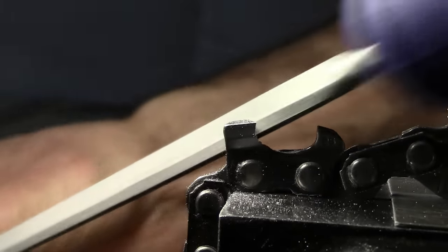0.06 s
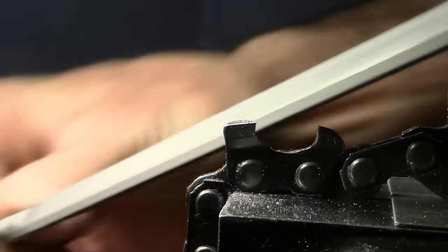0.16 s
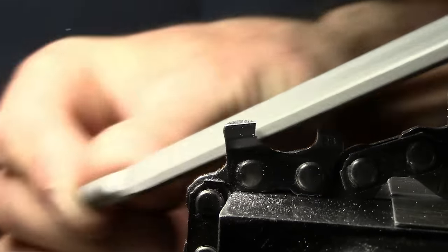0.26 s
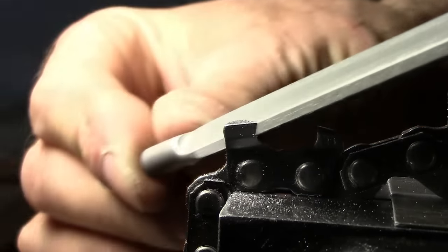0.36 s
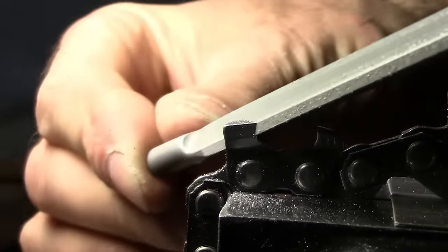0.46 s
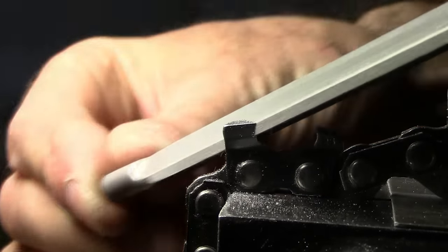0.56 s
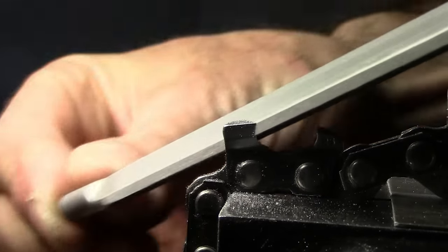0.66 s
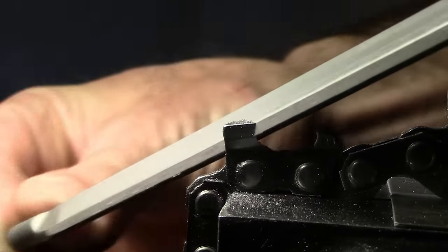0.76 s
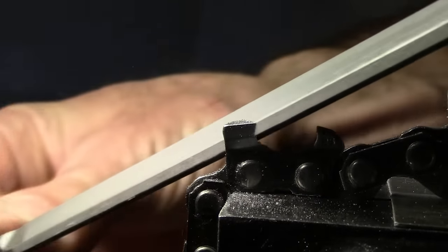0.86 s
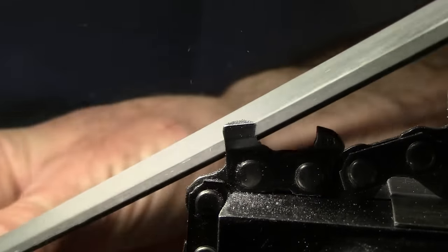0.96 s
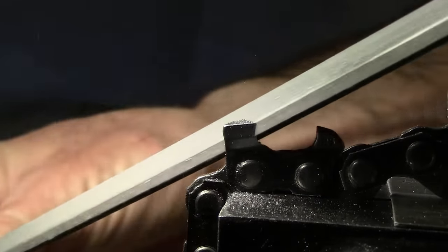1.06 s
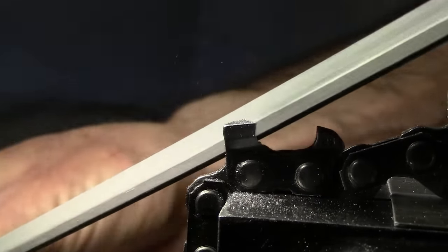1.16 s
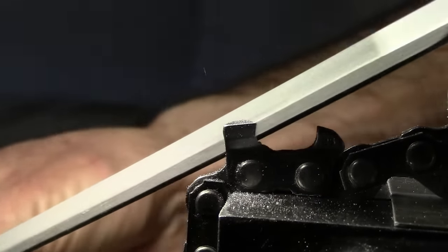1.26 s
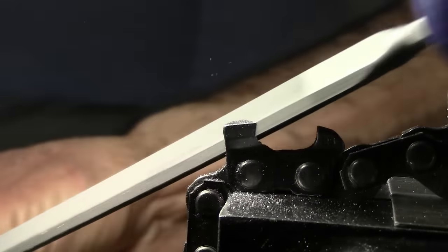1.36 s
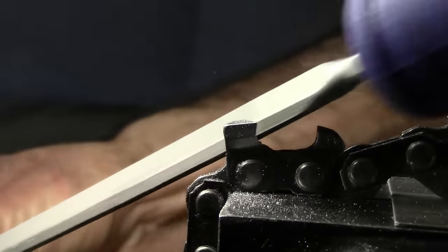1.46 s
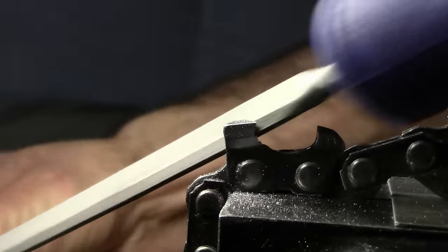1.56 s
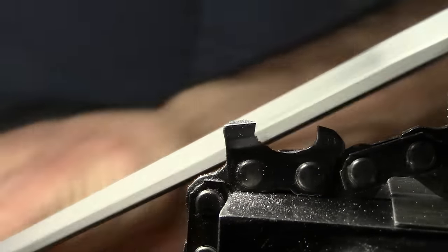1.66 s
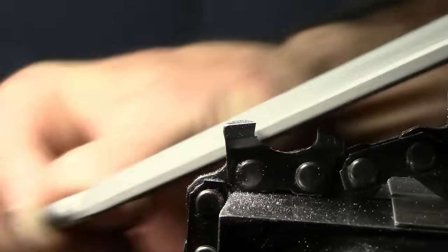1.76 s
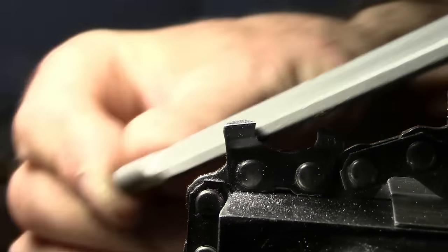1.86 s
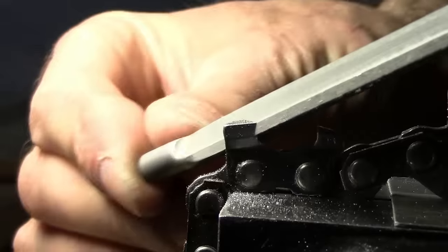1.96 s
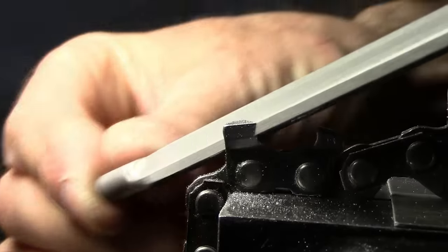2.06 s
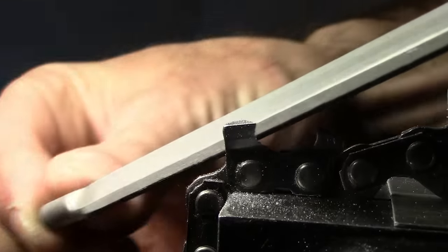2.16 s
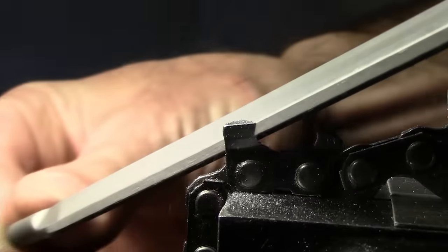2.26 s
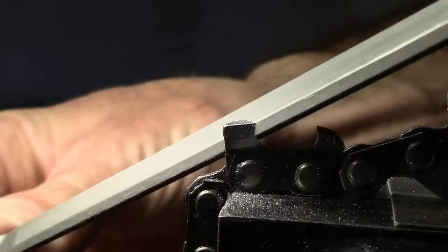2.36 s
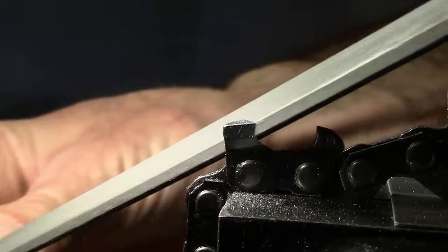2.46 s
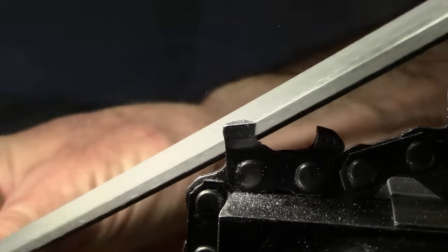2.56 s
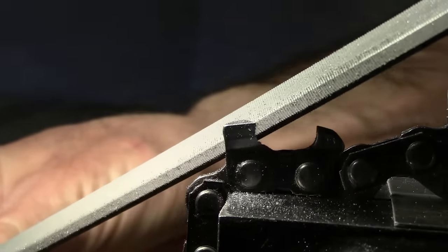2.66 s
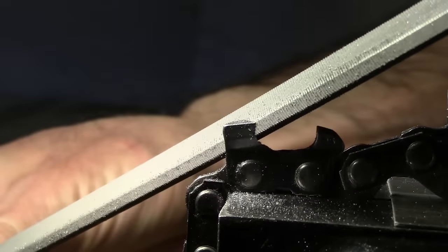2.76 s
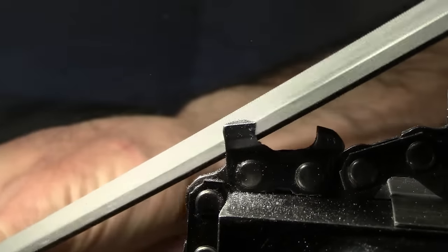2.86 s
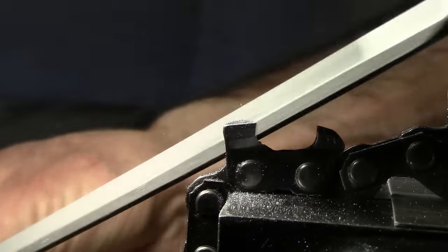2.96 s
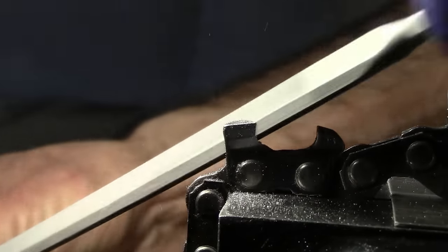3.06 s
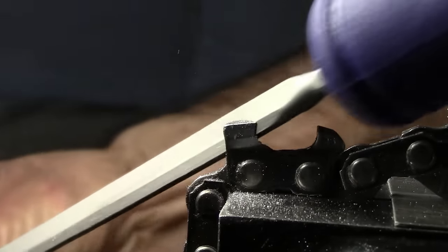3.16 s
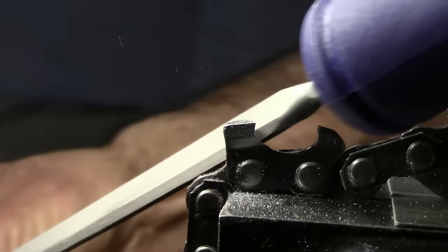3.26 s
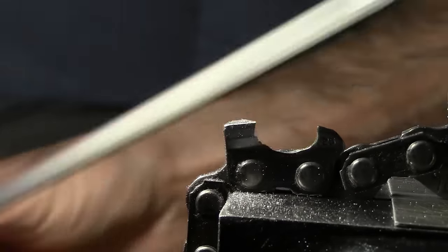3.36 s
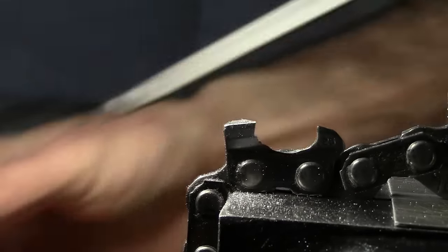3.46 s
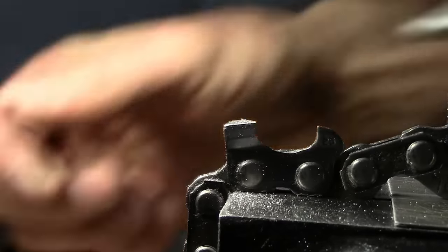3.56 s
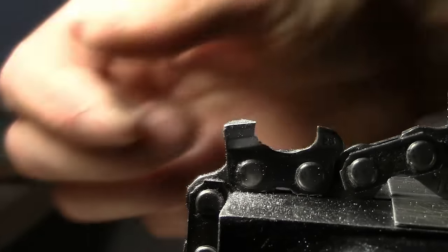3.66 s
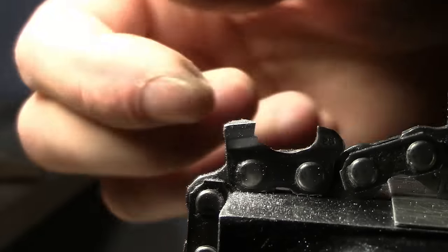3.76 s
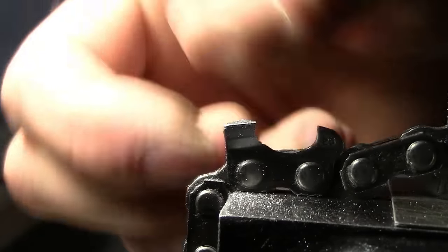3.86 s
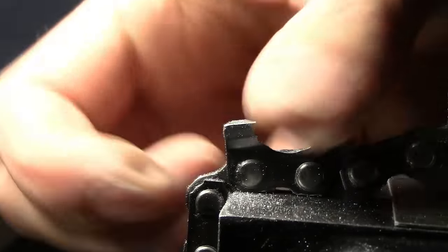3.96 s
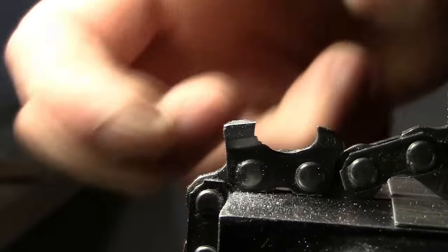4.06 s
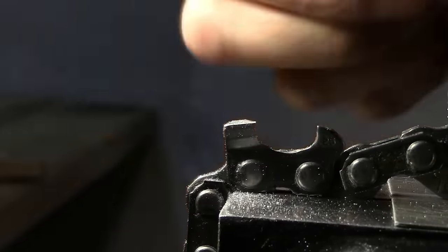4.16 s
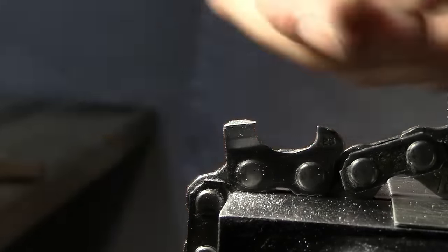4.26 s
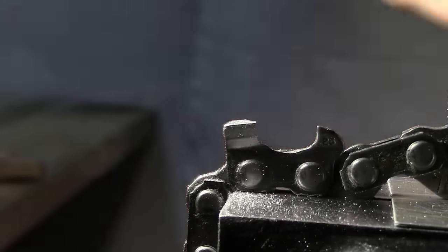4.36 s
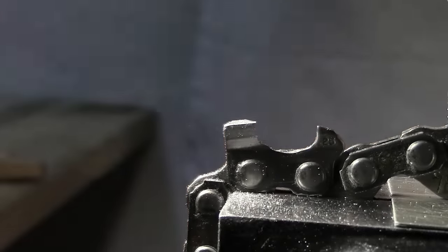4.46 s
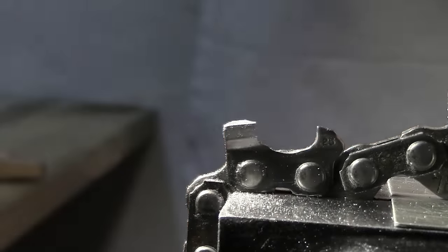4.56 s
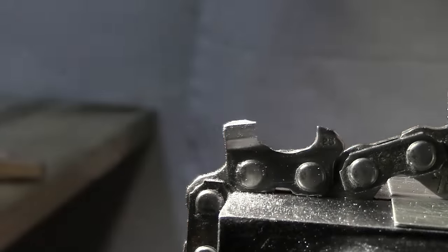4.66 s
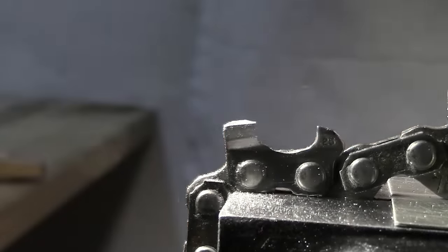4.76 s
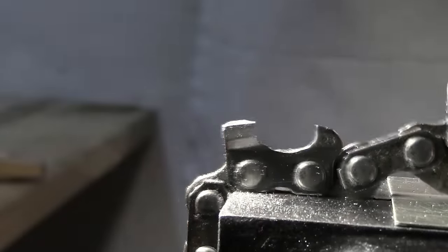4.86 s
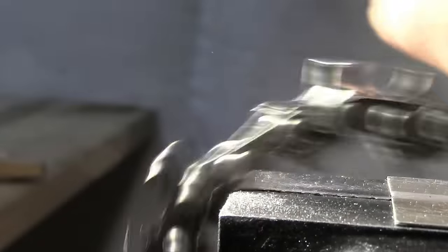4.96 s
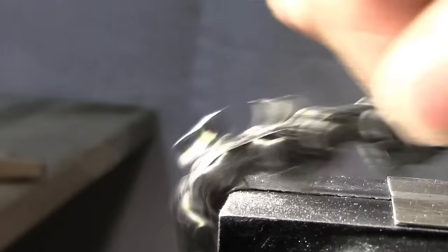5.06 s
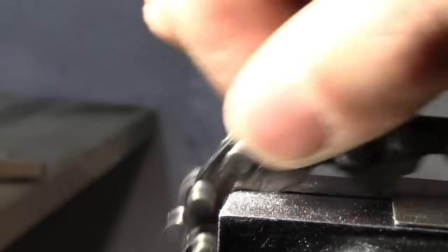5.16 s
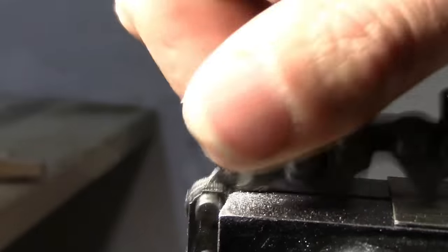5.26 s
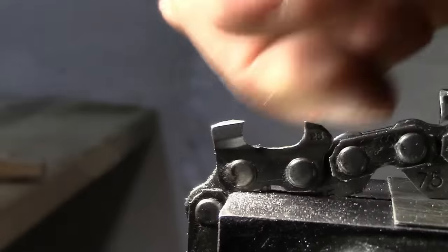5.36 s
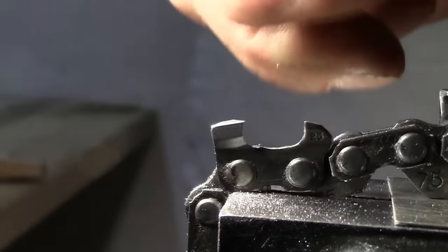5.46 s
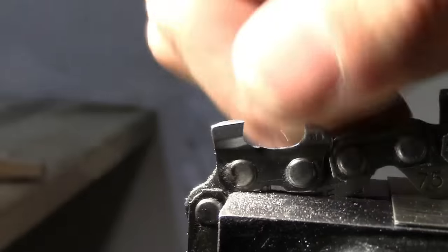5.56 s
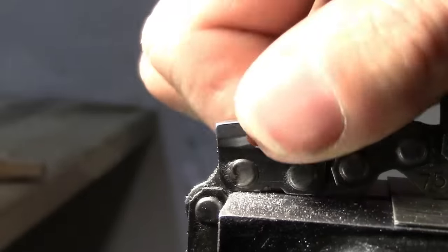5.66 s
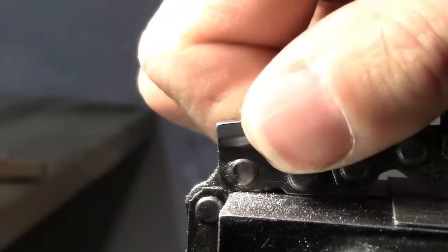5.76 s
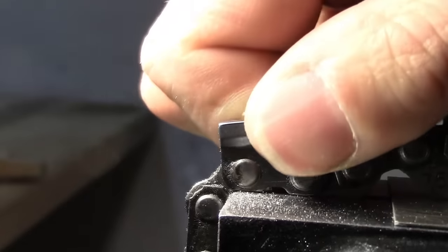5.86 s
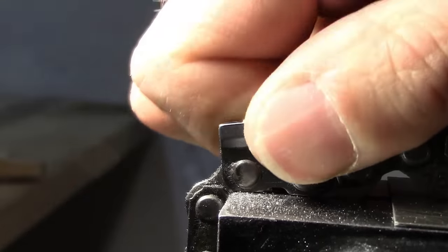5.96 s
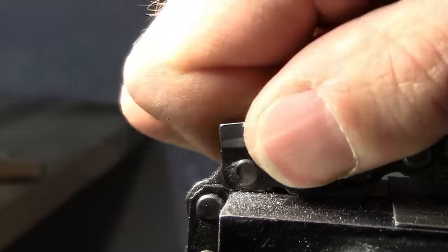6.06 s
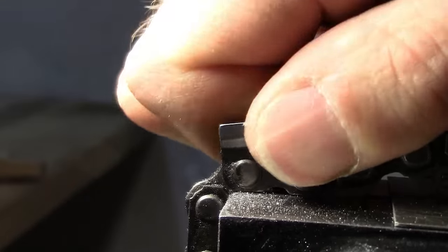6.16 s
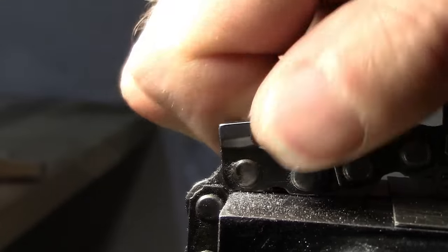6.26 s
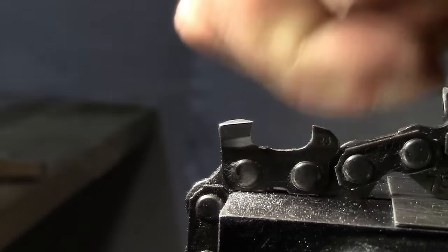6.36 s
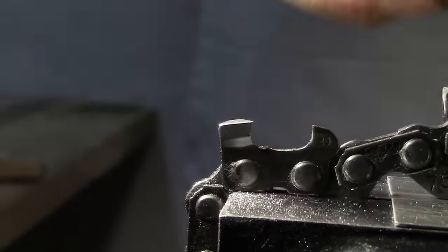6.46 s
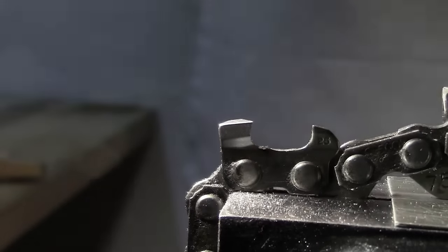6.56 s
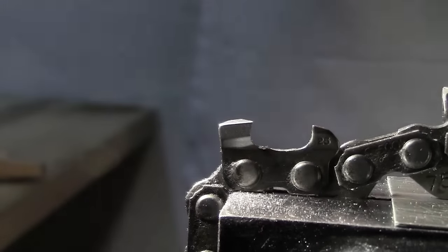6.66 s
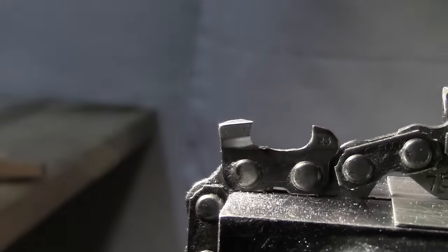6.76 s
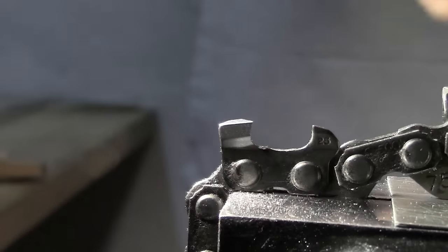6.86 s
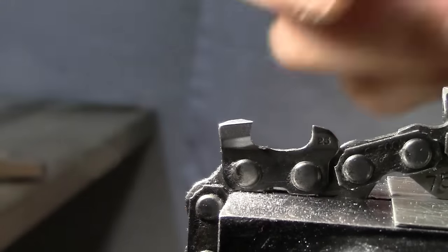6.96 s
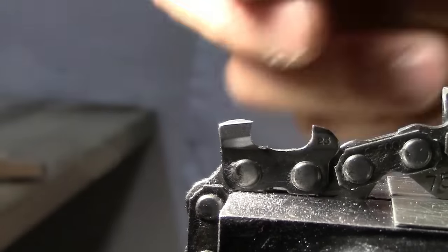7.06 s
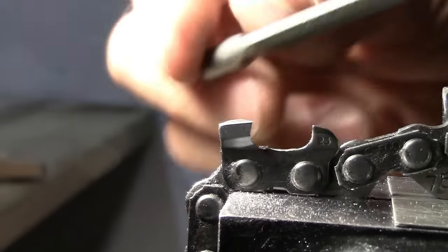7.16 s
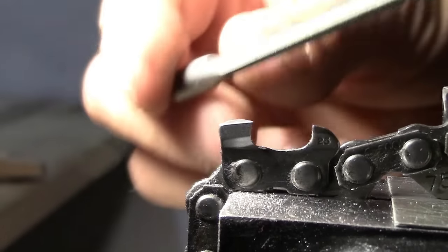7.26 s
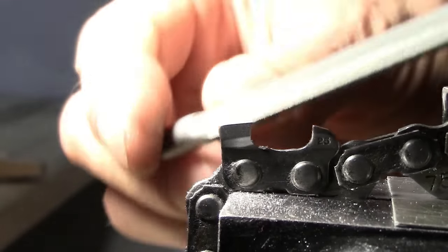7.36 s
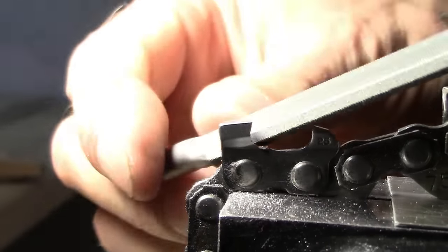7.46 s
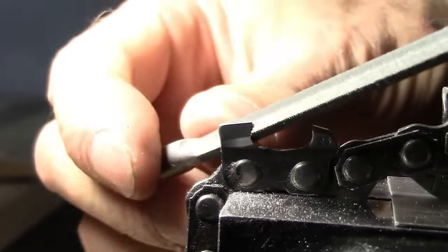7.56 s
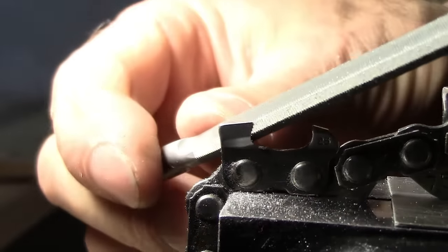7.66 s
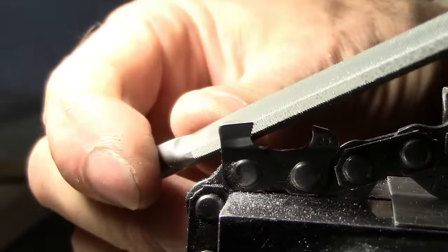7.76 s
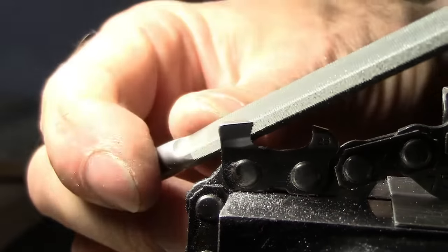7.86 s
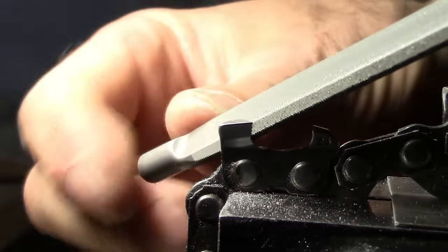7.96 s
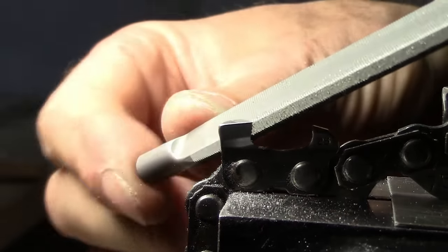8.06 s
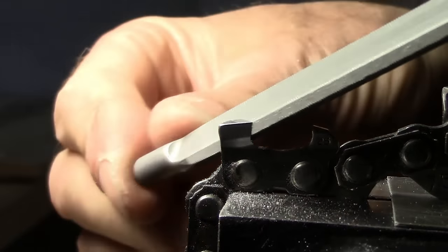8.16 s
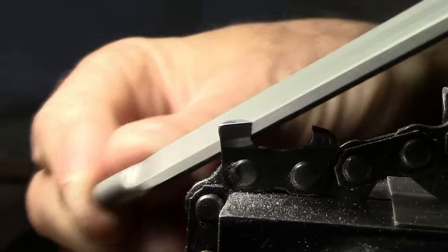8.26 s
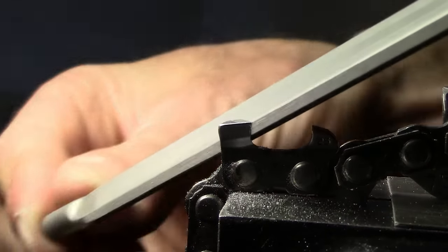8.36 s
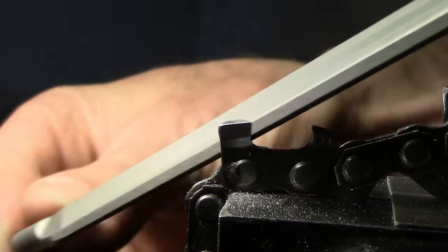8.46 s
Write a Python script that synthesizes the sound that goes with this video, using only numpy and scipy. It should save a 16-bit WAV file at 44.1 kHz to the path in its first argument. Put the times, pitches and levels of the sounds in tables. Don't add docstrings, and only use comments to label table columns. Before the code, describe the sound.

A hand file rasps and buzzes across a clamped steel chain cutter, drops ringing, then loose chain links rattle loudly before another stroke begins.

```python
import sys
import numpy as np
from scipy import signal
from scipy.fft import rfft, irfft, next_fast_len
from scipy.io import wavfile
from scipy.ndimage import uniform_filter1d, map_coordinates

SR = 44100
rng = np.random.default_rng(int(sys.argv[2]) if len(sys.argv) > 2 else 0)


def ratio(d):
    e = np.asarray(d, float) / 20
    return 10 ** e


def wrap_up_sound(samples):
    columns = np.atleast_2d(samples).T
    tamed = np.clip(columns, -1, 1)
    steps = np.round(tamed * 32767).astype(np.int16)
    wavfile.write(sys.argv[1], SR, steps)


N = 375732
GRID = 2 ** 14
HZ = np.arange(GRID // 2 + 1) * SR / GRID + 1e-3
BITE_S, LIFT_S = 0.073, 0.04


def rms_one(x):
    return x / np.sqrt(np.mean(x ** 2) + 1e-20)


def at_hz(points, hz):
    f, db = np.array(points).T
    return np.interp(np.log(hz), np.log(f), db)


def colour(points):
    return ratio(2 * at_hz(points, HZ))


def below(hz, order):
    return 1 / (1 + (HZ / hz) ** order)


def above(hz, order):
    return 1 / (1 + (hz / HZ) ** order)


def humps(modes):
    return sum(ratio(2 * db) / (1 + (2 * (HZ - hz) / width) ** 2) for hz, width, db in modes)


def body(x, power):
    cepstrum = irfft(.5 * np.log(power / np.mean(power) + 1e-12))
    cepstrum[1:GRID // 2] *= 2
    cepstrum[GRID // 2 + 1:] = 0
    impulse = irfft(np.exp(rfft(cepstrum)))
    return signal.oaconvolve(x, impulse)[:len(x)]


def in_time(tables, silent=None):
    rows = []
    for table in tables:
        ends = np.array([table[0], table[-1]], float)
        ends[:, 0] += [-.006, .006]
        if silent:
            ends[:, silent] = -110
        rows += [ends[0], *table, ends[1]]
    s, *columns = np.transpose(rows)
    return [np.interp(np.arange(N) / SR, s, c) for c in columns]


def window(start, end, rise, fall):
    t = np.arange(N) / SR
    return (np.clip((t - start) / rise, 0, 1) * np.clip((end - t) / fall, 0, 1)) ** 2


def drift(hz):
    lowpass = signal.butter(2, hz, fs=SR / 16, output="sos")
    slow = signal.sosfilt(lowpass, rng.standard_normal(N // 16 + 2))
    return np.interp(np.arange(N) / 16, np.arange(len(slow)), rms_one(slow))


def grit(per_s, spread_db):
    out = np.zeros(N)
    hit = np.flatnonzero(rng.random(N) < per_s / SR)
    size_db = spread_db * np.minimum(rng.exponential(1, N)[hit], 4)
    out[hit] = ratio(size_db) * (-1.) ** hit
    return rms_one(out)


def bursts(rows, rise):
    out, t = np.zeros(N + 8192), np.arange(8192) / SR
    noise = rng.standard_normal((len(rows), 8192))
    for (s, db, contact), push in zip(rows, noise):
        at, contact = round(s * SR), max(contact, 5e-4)
        shape = (1 - np.exp(-t / (contact * rise + 1e-5))) * np.exp(-t / contact)
        out[at:at + 8192] += ratio(db) * rms_one(push * shape) * np.sqrt(np.mean(shape ** 2))
    return out[:N]


# (start [s], end [s], rasp [dB], rasp sag [dB/s], tooth buzz re the stroke [dB])
PUSHES = [
    (-.1, 0.142, -28.5, 3, -14),
    (0.596, 1.679, -28, 2.5, 0.5),
    (2.105, 2.835, -29, 3.5, -1),
    (2.913, 3.343, -26.5, 14, -7.5),
    (8.297, 8.7, -32, -4, -1),
]
BENCH_LEAN_DB = [2, -0.2, 1.5, 0.3, 2.5]
JAW_LEAN_DB = [2, 0.3, -0.3, -2.5, 2.5]


def strokes():
    t = np.arange(N) / SR
    load = lean = jaw = rasp = sing = 0
    for (start, end, db, sag, buzz_db), bench_db, jaw_db in zip(PUSHES, BENCH_LEAN_DB, JAW_LEAN_DB):
        hold = ratio(db) * window(start, end, BITE_S, LIFT_S)
        since = np.clip(t - start, 0, 2)
        left = np.clip(end - t - .3, 0, 2)
        rasp = rasp + hold * ratio(-sag * since)
        load = load + hold * ratio(-0.65 * sag * since)
        lean = lean + hold * ratio(bench_db)
        jaw = jaw + hold * ratio(jaw_db - 5 - 10 * left)
        sing = sing + hold * ratio(buzz_db)
    return load, lean, jaw, rasp, sing


# (time [s], level [dB], hold [s], fade [s])
FILE_SKIDS = [
    (0.428, -21, 0.017, 0.034),
    (1.9515, -24, 0.068, 0.014),
]


def skids():
    t = np.arange(N) / SR
    return sum(ratio(db) * window(s, s + 1, 0.0042, .5) * np.exp(-np.maximum(t - s - hold, 0) / fade)
               for s, db, hold, fade in FILE_SKIDS)


def wandering(push, modes, spectrum, count):
    signs = rng.choice([-1, 1], (count, N))
    powers = [spectrum * humps(modes[k::count]) / 3 for k in range(count)]
    groups = 0
    for sign, power in zip(signs, powers):
        path = np.arange(N) + SR * .0012 * drift(2.5)
        group = map_coordinates(body(push * sign, power), [path], order=2)
        groups = groups + ratio(4.5 * drift(5) + 2.0 * drift(25)) * np.sqrt(np.mean(power)) * group
    plain = np.sqrt(np.mean(spectrum)) * body(push, spectrum)
    return (groups + plain) / np.sqrt(np.mean(spectrum + 1.48 * sum(powers)))


# (frequency [Hz], level [dB per Hz])
RASP_SPECTRUM = [(880, -22.5), (1500, -24), (1780, 1.5), (2940, -7), (5810, -10.5), (6560, -6),
                 (10600, -12), (15400, -22.5), (16500, -62.5)]
# (frequency [Hz], width [Hz], level [dB])
CUTTER_MODES = [(2600, 73, 7), (3252, 45, 10.5), (4135, 280, 9), (6380, 310, 6.5), (7530, 310, 6),
                (8160, 160, 1.5), (9700, 160, 1), (10200, 540, 2.5), (12900, 120, -23)]


def cutter_rasp(cut, hits):
    push = ratio(-3.0) * cut * ratio(0.91 * drift(120)) * grit(6000, 1.8)
    push = push + ratio(0.5) * bursts(hits["top"], rise=0.24)
    dense_hz = 1700 * 9.0 ** ((np.arange(30) + rng.random(30)) / 30)
    modes = [(hz, width, db + 5.0) for hz, width, db in CUTTER_MODES]
    modes += [(hz, hz / 70, 10.0) for hz in dense_hz]
    return wandering(push, modes, colour(RASP_SPECTRUM), count=7)


# (start [s], end [s], level re the rasp [dB])
CHATTER_SPANS = [
    (.93, 1.2, 5),
    (2.4, 2.8, 2.5),
    (2.94, 3.3, -12),
]


def cutter_chatter(cut):
    chatter = ratio(-12) + sum(ratio(db) * window(a, b, 0.105, 0.105) for a, b, db in CHATTER_SPANS)
    return body(cut * chatter * ratio(-6) * grit(6000, 2.3), humps([(4750, 770, 0)]) ** 2)


# (frequency [Hz], width [Hz], level [dB])
TIP_MODES = [(2550, 90, -5), (3240, 90, 0), (4050, 180, -2), (6300, 250, -5)]
TIP_TIMES = [.61, 2.13, 8.31]


def file_tip():
    t = np.arange(N) / SR
    tip = sum(window(s, s + 1, BITE_S, 0.48) * np.exp(-np.maximum(t - s, 0) / .3) for s in TIP_TIMES)
    return body(ratio(-36 + 1.6 * drift(23)) * tip * grit(6600, 2.4), humps(TIP_MODES) ** 2)


# (time [s], tooth rate [Hz])
TOOTH_RATES = [
    [(.62, 480), (.7, 700), (.75, 901), (.9, 1073), (1.0, 1304), (1.08, 1404), (1.18, 1764), (1.45, 1092),
     (1.65, 620)],
    [(2.13, 601), (2.2, 851), (2.26, 965), (2.38, 1085), (2.49, 1130), (2.53, 1350), (2.66, 1412),
     (2.78, 1798), (2.83, 1224)],
    [(2.95, 917), (3.01, 1390), (3.08, 1453), (3.14, 1772), (3.3, 799)],
    [(8.33, 506), (8.4, 614), (8.47, 904), (8.52, 1136)],
]
# (frequency [Hz], width [Hz], level [dB])
LOCKING_MODES = [(596, 25, -4), (701, 22, 0), (853, 25, -2), (914, 22, 0), (977, 22, 0), (1109, 22, 1),
                 (1248, 25, 0), (1320, 25, -2), (1407, 30, 1), (1520, 25, -5), (1775, 50, -3),
                 (2010, 50, 0), (2500, 80, 0)]


def tooth_buzz(sing):
    hz, = in_time(TOOTH_RATES)
    coasting = uniform_filter1d(1. * (np.gradient(hz) <= 0), size=2000)
    level = sing * ratio(-20 * coasting) / (1 + (530 / hz) ** 8)
    phase = 2 * np.pi * np.cumsum(hz * (1 + 0.1 * drift(170) + .008 * drift(12))) / SR
    buzz = level * ratio(2.5 * drift(120)) * (np.sin(phase) + 0.3 * np.sin(2 * phase))
    return body(ratio(-10) * buzz, humps(LOCKING_MODES) ** 1.5 + ratio(-60))


# (frequency [Hz], width [Hz], level [dB])
VICE_MODES = [(466.7, 23, 0.5), (553, 39.5, 3), (595, 16, -4), (696, 20, -3), (844, 29, -8),
              (917, 17, -9.5), (971, 20, -4.5), (1113, 28, -4), (1244, 29, -8.5), (1395, 55, -5),
              (1510, 28.8, -15.5), (1787, 100, -8.5), (1990, 54, -8.5), (2640, 83, -15.5)]


def vice_body(load, jaw, skid, rub, rub_db, hits):
    push = load * ratio(-4.5 + 0.882 * drift(22)) + skid * ratio(-8.5)
    push = push * ratio(2.0 * drift(70)) * grit(2500, 2.7)
    out = body(push, (humps(VICE_MODES[3:]) + ratio(-29)) * below(3000, 8) * above(400, 6))
    jaw_push = jaw * ratio(2.6 * drift(5.4)) * grit(4000, 2.66)
    out += body(jaw_push, humps(VICE_MODES[:3]) * below(800, 6) * above(400, 6))
    blows = ratio(2.0) * bursts(hits["vice"], rise=0.27) + ratio(5.5) * bursts(hits["groove"], rise=0.098)
    blows = blows + rub * ratio(-29 + rub_db) * grit(4000, 2.8)
    return out + body(blows, (humps(VICE_MODES) + ratio(-25.0)) * below(2800, 12) * above(640, 6))


# (frequency [Hz], width [Hz], level [dB])
BENCH_MODES = [(165.4, 5.8, -3), (188.5, 19, -2), (213, 12, 4), (248.6, 20, -5.5), (354, 11, -6)]
# (frequency [Hz], width [Hz], level [dB])
AIR_MODES = [(77.5, 5.1, 5.5), (119.7, 2.8, -4)]
# (time [s], level [dB], contact time [s])
HANDLE_THUD = [
    (3.875, -28, 0.022),
]


def bench_boom(lean, skid, rub, seat, seat_vice_db, hits):
    push = lean * ratio(-2.5 + 1.8 * drift(7.4)) + skid * ratio(-17.5)
    push = (push + rub * ratio(-38.5) + seat * ratio(seat_vice_db - 8.5)) * grit(3000, 0.73)
    push = push + ratio(9.5) * bursts(hits["bench"], rise=3.05)
    thud = bursts(HANDLE_THUD, rise=0.85)
    plate = body(push + ratio(-12.0) * thud, humps(BENCH_MODES) * below(420, 10) * above(130, 4))
    return plate + body(ratio(-9.5) * push + thud, humps(AIR_MODES) * below(150, 8))


# (time [s], level into the vice [dB], top re that [dB], contact time [s])
METAL_TAPS = [(0.436, -19.5, -17, 0.0064), (1.954, -57, -1, 0.0028), (3.379, -30, -3.5, 0.0054),
              (4.367, -57.5, 16, 0.014), (5.745, -44.5, -1, 0.012), (6.087, -37, -3, 0.014),
              (6.151, -30.5, -5.5, 0.019), (7.358, -41.5, -8, 0.005), (7.594, -23.5, -12, 0.007),
              (7.668, -48, 13, 0.0044), (7.951, -67, 0, 0.004), (8.157, -50.5, 4, 0.005)]
# (time [s], level into the bench [dB], vice re that [dB], contact time [s])
SCREW_THUMPS = [
    (4.644, -15, -10, 0.02),
    (6.351, -18.5, -7.5, 0.022),
    (6.399, -15.5, -13.5, 0.017),
    (6.469, -30, -17, 0.0074),
    (8.051, -32, -19, 0.0072),
]
# (time [s], level [dB], contact time [s])
LINK_LIFTS = [
    (4.904, -42.5, 0.019),
    (4.929, -34, 0.0024),
    (4.9467, -35, 0.0039),
    (4.993, -20.5, 0.0045),
    (5.0352, -33, 0.013),
]
# (time [s], level [dB], top re that [dB], contact time [s])
LINK_SNAPS = [(4.8041, -11, -23, 0.0016), (4.9912, -13, -22, 0.0033), (5.0913, -16, -9.5, 0.0016),
              (5.1115, -11.5, 7, 0.0046), (5.115, -15.5, -1, 0.00251), (5.1214, -21.5, -8, 0.0034),
              (5.166, -15, -3.5, .001), (5.1872, -18.5, 11, 0.0058), (5.194, -19.5, -12, 0.0076),
              (5.2484, -10, -5, 0.0013), (5.2656, -13.5, 11.5, 0.0019), (5.2707, -12.5, -12, .003),
              (5.2773, -19, -12.5, 0.0056), (5.2877, -6.5, 0, .0015), (5.3400, -11.5, 7.5, 0.0025),
              (5.3787, -17, 2, 0.0048), (5.385, -24, -17.5, .006), (5.4124, -12.5, 0, 0.00068)]


def contacts():
    hits = {name: [] for name in ("bench", "vice", "top", "groove", "links", "rattle")}
    for s, db, top_db, contact in METAL_TAPS:
        hits["bench"].append((s, db - 18.5, contact))
        hits["vice"].append((s, db, contact))
        hits["top"].append((s, db + top_db, contact))
    for s, db, vice_db, contact in SCREW_THUMPS:
        hits["bench"].append((s, db, contact))
        hits["vice"].append((s, db + vice_db, contact))
        hits["top"].append((s, db - 35, contact))
    for s, db, contact in LINK_LIFTS:
        hits["groove"].append((s, db + 3.5, contact))
        hits["links"].append((s, db, contact))
        hits["rattle"].append((s, db - 24, contact))
    for s, db, top_db, contact in LINK_SNAPS:
        hits["groove"].append((s, db - 15.5, contact))
        hits["links"].append((s, db, contact))
        hits["rattle"].append((s, db + top_db, contact))
    return hits


# (frequency [Hz], width [Hz], level [dB])
LANDING_MODES = [(451, 41, -4.5), (700, 33, -17), (920, 50, -32), (1402, 44, 3), (1693, 36, -6),
                 (2034, 39, -9), (2220, 35, -5), (2410, 22, -9), (2750, 105, -2), (3040, 52, -12)]


def file_landing(skid):
    s, db, *_ = SCREW_THUMPS[1]
    push = ratio(-2.5) * skid * grit(900, 4.0) + bursts([(s, db - 7.5, .012)], rise=0.05)
    return body(push, (humps(LANDING_MODES) + ratio(-38.0)) * below(2800, 12) * above(350, 6))


# (time [s], links [dB], extra vice [dB], extra top [dB])
CHAIN_DRAG = [
    [(4.88, -54, -22, -6), (4.92, -43, -19, -4), (4.985, -48, -15, -6), (5.0, -41, -2, -10),
     (5.04, -37, -5, 7), (5.1, -37, -8, 2), (5.168, -30.5, -4.5, 0), (5.278, -31, -5.5, 1),
     (5.372, -40, -5.5, 1), (5.412, -43, -5.5, 1), (5.44, -67, -6, 1)],
]


def chain_drag():
    links_db, vice_db, top_db = in_time(CHAIN_DRAG, silent=1)
    rub = window(4.89, 5.44, 0.012, 0.012) * ratio(4.1 * drift(40))
    return rub, ratio(links_db + 5.1 * drift(51)), vice_db, top_db


# (frequency [Hz], level [dB per Hz])
LINK_SPECTRUM = [(900, -30), (1600, -8), (2200, -3), (4000, -2), (7500, -2), (9500, -8), (13400, -15),
                 (16000, -23), (16800, -40)]
# (frequency [Hz], width [Hz], level [dB])
CUTTER_LINK_MODES = [(4960, 50, 26), (5230, 90, 12), (5760, 50, 27), (9100, 200, 16), (10200, 250, 14)]
CUTTER_LINK_TIMES = [5.109, 5.185, 5.263, 5.373]


def chain_links(drag, top_db, hits):
    ringing = [row for row in hits["links"] if any(0 <= row[0] - s < .017 for s in CUTTER_LINK_TIMES)]
    plain = [row for row in hits["links"] if row not in ringing]
    spectrum = colour(LINK_SPECTRUM)
    links = spectrum * below(7500, 6)
    knocks = ratio(2.0) * drag * grit(5000, 1.3) + ratio(-3.0) * bursts(plain, rise=0.021)
    rattle = drag * ratio(-8.5 + top_db) * grit(5000, 3.1) + ratio(-3.0) * bursts(hits["rattle"], rise=0.11)
    far = body(knocks, links) + body(rattle, spectrum * above(7000, 6))
    close = body(ratio(4.5) * bursts(ringing, rise=0.019), links * (1 + humps(CUTTER_LINK_MODES)))
    return far, close


# (time [s], level [dB], vice re that [dB])
SEATING_SLIDES = [
    [(5.89, -55, 10), (6.04, -41.5, 4), (6.082, -54, 13.5), (6.108, -39.5, 8), (6.15, -39.5, 8),
     (6.22, -42, 10.5), (6.25, -59, 17), (6.32, -67, 10)],
    [(7.6, -31, -7), (7.614, -54.5, 11), (7.684, -41.5, 6.5), (7.71, -64, 23)],
]


def seating_slide():
    db, vice_db = in_time(SEATING_SLIDES, silent=1)
    return ratio(db + 2.0 * drift(36.9)), vice_db


# (frequency [Hz], width [Hz], level [dB])
SEAT_LOW_MODES = [(543, 85, -2.5), (860, 84, -6.5), (1094, 58, -3), (1385, 46, -3), (1549, 29, -4),
                  (1765, 27, -2.5), (2000, 50, -3.5), (2900, 161, -11)]
# (frequency [Hz], width [Hz], level [dB])
SEAT_HIGH_MODES = [(3820, 59, -4.5), (4800, 220, -6), (5480, 230, -4), (6490, 580, 1.5), (7300, 39, -11),
                   (8270, 169, -9), (9900, 86, -9.5)]


def seating_scrape(seat, vice_db):
    low = (humps(SEAT_LOW_MODES) + ratio(-35.0)) * above(450, 6) * below(3200, 10)
    far = body(seat * ratio(vice_db - 3.5) * grit(5000, 0.77), low)
    return far, body(seat * grit(7900, 1.5), humps(SEAT_HIGH_MODES) * above(3500, 8))


# (time [s], level [dB], pitch [Hz], contact time [s])
STEEL_TICKS = [(3.368, -34, 2100, .006), (3.37, -36, 4200, .008), (4.726, -44, 6000, .001),
               (4.8658, -34, 9500, .001), (4.9915, -4.5, 1980, .0015), (4.992, -9, 5500, .001),
               (5.0915, -12, 3600, .0015), (5.092, -14, 8600, .001), (5.1118, -9, 5500, .002),
               (5.152, -16, 8000, .0007), (5.162, -16, 3600, .002), (5.1675, -7, 8100, .001),
               (5.1725, -11, 6000, .001), (5.1875, -9, 5500, .002), (5.2095, -11, 9800, .0015),
               (5.241, -8, 8200, .0005), (5.2495, -7, 1910, .002), (5.2662, -6, 5500, .003),
               (5.2872, -10, 2900, .003), (5.296, -16, 9000, .003), (5.3405, -4, 6200, .002),
               (5.341, -8, 9200, .0015), (5.3747, -6, 6000, .0007), (5.393, -14, 7500, .001),
               (5.4025, -9, 3500, .001), (5.408, -16, 6500, .001), (5.4123, -2, 7350, .0015),
               (5.4158, -6, 7600, .004), (5.417, -16, 2200, .003), (7.358, -42, 2600, .003),
               (7.5955, -27, 6500, .003), (7.6, -35, 4200, .01), (7.597, -30, 7800, .008),
               (7.6905, -18, 8000, .0005),
               (.4285, -17, 5300, .003), (.4368, -16.5, 4630, .002), (.446, -27, 6000, .001),
               (.4777, -20, 7220, .002), (.502, -23, 7500, .002), (0.521, -35, 7400, .002),
               (.5381, -36, 7330, .002), (.548, -32, 7530, .002), (.6144, -34, 6300, .004),
               (1.955, -15, 5770, .006), (1.9635, -11.5, 5740, .001), (1.973, -19, 5000, .0006),
               (1.979, -14, 5500, .0006), (1.9885, -17, 6500, .001), (1.994, -19, 5000, .0008),
               (2.007, -23, 6000, .0008), (2.01, -24, 8000, .001), (2.025, -25, 6000, .002),
               (2.0326, -22, 7460, .004), (4.638, -39, 5500, .003), (4.646, -30, 3900, .002),
               (4.651, -23.5, 2000, .004), (6.0993, -31, 7500, .002), (6.1087, -26, 4200, .002),
               (6.1492, -32, 7500, .002), (6.216, -33, 6500, .002), (6.351, -36, 6100, .002),
               (6.351, -15.5, 1450, .006), (8.318, -46, 6000, .004), (8.345, -49, 3500, .004)]


def ticks():
    out, rows = np.zeros(N + 4096), STEEL_TICKS
    for (s, db, hz, contact), push in zip(rows, rng.standard_normal((len(rows), 4096))):
        shape = np.exp(-np.arange(4096) / SR / max(contact, 3e-4))
        peak = signal.iirpeak(hz, 2.66, fs=SR)
        tick = signal.lfilter(*peak, signal.lfilter(*peak, push * shape))
        at = round(s * SR)
        out[at:at + 4096] += ratio(db) * tick / np.max(np.abs(tick))
    return signal.sosfilt(signal.butter(2, 11000, fs=SR, output="sos"), out[:N])


# (start [s], end [s], frequency [Hz], level [dB])
JAW_SQUEALS = [(5.89, 5.93, 1500, -52), (5.97, 6.04, 1400, -45), (5.98, 6.05, 1090, -48),
               (6.0, 6.05, 900, -48), (6.04, 6.13, 2020, -46), (6.07, 6.12, 860, -38),
               (6.08, 6.13, 1528, -42), (6.14, 6.24, 1525, -31), (6.145, 6.21, 785, -39),
               (6.17, 6.27, 2790, -43), (6.185, 6.34, 1775, -38), (6.2, 6.25, 1075, -41),
               (7.594, 7.67, 554, -41), (7.594, 7.64, 2010, -38), (7.62, 7.69, 1250, -43),
               (7.594, 7.64, 2630, -44), (7.594, 7.64, 1110, -40), (7.594, 7.64, 4140, -46),
               (7.596, 7.62, 7730, -47), (7.63, 7.7, 7730, -54), (7.594, 7.62, 2960, -48),
               (4.888, 4.93, 860, -36), (4.935, 4.99, 720, -33), (4.92, 4.97, 1500, -38),
               (7.64, 7.68, 1110, -42), (.525, .56, 580, -36), (5.99, 6.08, 890, -46),
               (6.19, 6.23, 1400, -40)]


def squeals():
    t, out = np.arange(N) / SR, 0
    waver = np.cumsum(0.006 * drift(40)) / SR
    for start, end, hz, db in JAW_SQUEALS:
        level = ratio(db + 3.5) * window(start, end, .015, .03) * np.exp(-np.maximum(t - start, 0) / .12)
        out = out + level * np.sin(2 * np.pi * hz * (t + waver))
    return ratio(2.5 * drift(50)) * out


def steelwork():
    load, lean, jaw, rasp, sing = strokes()
    skid = skids()
    hits = contacts()
    rub, drag, drag_vice_db, drag_top_db = chain_drag()
    seat, seat_vice_db = seating_slide()
    cut = (rasp + skid) * ratio(0.5 * drift(37))
    links_far, links_close = chain_links(drag, drag_top_db, hits)
    seat_far, seat_close = seating_scrape(seat, seat_vice_db)
    far = tooth_buzz(sing) + vice_body(load, jaw, skid, rub, drag_vice_db, hits)
    far += bench_boom(lean, skid, rub, seat, seat_vice_db, hits) + file_landing(skid)
    far += links_far + seat_far + ticks() + squeals()
    close = cutter_rasp(cut, hits) + cutter_chatter(cut) + file_tip() + links_close + seat_close
    return far, close


FILE_MODES_HZ = [5762, 6417, 7649, 9824, 10170, 11550, 12261, 13570, 14840]
# (level [dB], t60 [s])
FILE_DECAYS = [(-8.5, 0.58), (-24, .25), (2, 0.66), (9, 0.19), (-29.5, 0.5), (-25.5, 0.34), (-6.5, 0.15),
               (-13, 0.13), (-20, 0.18)]
# (frequency [Hz], level [dB per Hz])
CRACK_SPECTRUM = [(290, -24), (550, -11), (1000, -15), (1800, -9), (2600, -5.5), (6960, -2), (8930, -9.5),
                  (15300, -14.5), (16500, -54.5)]


def dropped_file():
    drop_s, settle_s = 3.837, 4.09
    t = np.maximum(np.arange(N) / SR - drop_s, 0)
    ring = 0
    for hz, (db, t60) in zip(FILE_MODES_HZ, FILE_DECAYS):
        pair = np.sin(2 * np.pi * hz * t) + 0.18 * np.sin(2 * np.pi * (hz + 31) * t)
        build_up = 1 - np.exp(-t / (0.049 * (7600 / hz) ** 3.0))
        ring = ring + ratio(-13.5 + db - 60 * t / t60) * pair * build_up
    ring = ring * ratio(-110 * np.maximum(t + drop_s - settle_s, 0))
    blows = [(drop_s, -1.5, .0022), (drop_s + 0.0145, -13.5, .005), (drop_s, -19.5, .03)]
    return body(bursts(blows, rise=0.12), colour(CRACK_SPECTRUM)), ring


# (time [s], frequency [Hz], level [dB])
FILE_SQUEAKS = [
    [(3.44, 9150, -62), (3.47, 9200, -67), (3.55, 9300, -69), (3.6, 8950, -70)],
    [(7.72, 8900, -71), (7.76, 9540, -70), (7.83, 9550, -63), (7.92, 9000, -68), (8.0, 9300, -66),
     (8.04, 10200, -71), (8.08, 10300, -76), (8.11, 9560, -62), (8.14, 8600, -68)],
]


def squeaks():
    hz, db = in_time(FILE_SQUEAKS, silent=2)
    phase = 2 * np.pi * np.cumsum(hz + 40 * drift(80)) / SR
    return ratio(db + 3.5 + 3.1 * drift(50)) * np.sin(phase)


# (frequency [Hz], t60 [s])
REVERBERATION = [(60, 1.38), (200, 0.78), (1000, 0.6), (4000, 0.41), (9000, 0.24), (16000, 0.2)]


def workshop(x):
    t, tail = np.arange(SR) / SR, 0
    for hz in 44 * 2 ** np.arange(9):
        edges = [hz / 2 ** .5, min(hz * 2 ** .5, .45 * SR)]
        band = signal.butter(2, edges, "band", fs=SR, output="sos")
        noise = signal.sosfilt(band, rng.standard_normal(SR))
        tail = tail + noise * ratio(-60 * t / at_hz(REVERBERATION, hz))
    tail = tail * (1 - np.exp(-t / 0.0028))
    return ratio(-9) * signal.fftconvolve(x, tail / np.sqrt(np.sum(tail ** 2)))[:N]


# (frequency [Hz], level [dB])
SIDE_SPECTRUM = [(60, -8), (150, -17), (400, -13), (1300, -16.5), (2400, -17.5), (4400, -12), (8000, -13.5),
                 (15000, -1)]


def near_scatter(mid):
    scatter = rng.standard_normal(6000) * np.exp(-np.arange(6000) / SR / 0.0073)
    spectrum = rfft(scatter)
    scatter = irfft(spectrum / uniform_filter1d(np.abs(spectrum), size=9))
    scattered = signal.fftconvolve(mid, scatter / np.sqrt(np.sum(scatter ** 2)))[:N]
    return ratio(-9.0) * body(scattered, colour(SIDE_SPECTRUM))


# (frequency [Hz], level [dB per Hz])
FLOOR_SPECTRUM = [(12, -30.5), (20, 0.5), (33, -4), (55, -12.5), (230, -9.5), (273, -12), (452, -16),
                  (750, -19), (1110, -21), (1470, -22), (5210, -30.5), (15200, -41.5), (16500, -55.5)]


def background(db):
    return ratio(db) * body(rng.standard_normal(N), colour(FLOOR_SPECTRUM))


# (frequency [Hz], level [dB])
CAPSULE_TILT = [(250, -1.6), (600, -.9), (2000, -.4), (5000, -.9), (12000, -.1)]


def two_microphones(mid, side):
    size = next_fast_len(N)
    lean = ratio(at_hz(CAPSULE_TILT, np.arange(1, size // 2 + 2) * SR / size) / 2)
    return irfft(rfft([mid + side, mid - side], size) * [lean, 1 / lean], size)[:, :N]


def scene():
    far, close = steelwork()
    crack, ring = dropped_file()
    far, close = far + crack, close + ring + squeaks()
    mid = far + close + workshop(far + ratio(-4) * close)
    side = near_scatter(mid) - 0.19 * ring
    return two_microphones(mid + background(-51), side + background(-54))


def low_pass(x):
    return signal.sosfilt(signal.butter(12, 16660, fs=SR, output="sos"), x)


def record(dry):
    lowpass = signal.cheby2(14, 60, 16850, fs=SR, output="sos")
    mix = np.clip(signal.sosfilt(lowpass, np.clip(dry, -1, 1)), -1, 1)
    return low_pass(mix)


dry = scene()
out = record(dry)
wrap_up_sound(out)
```